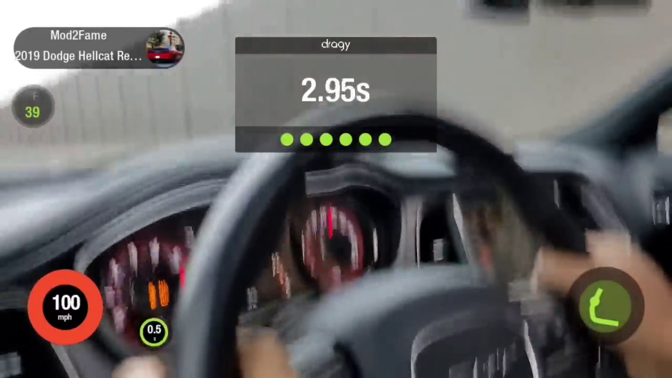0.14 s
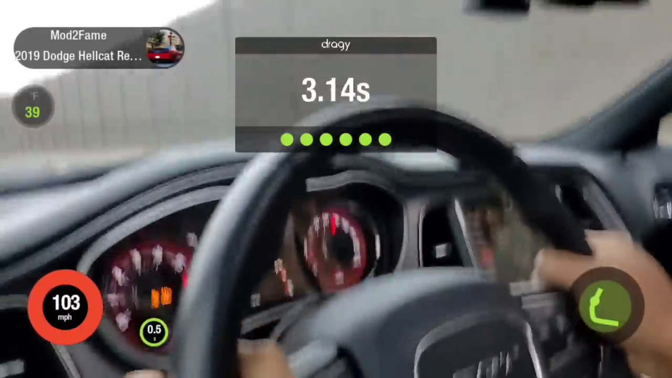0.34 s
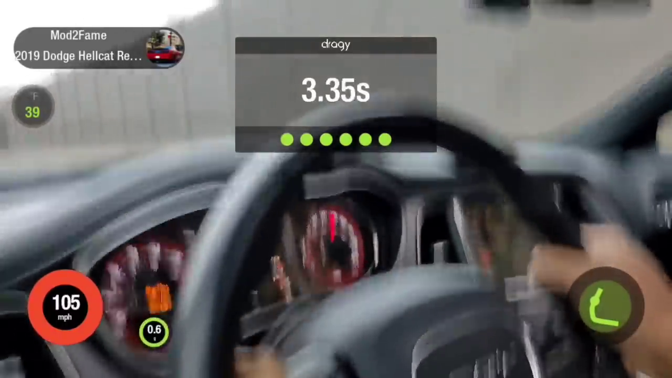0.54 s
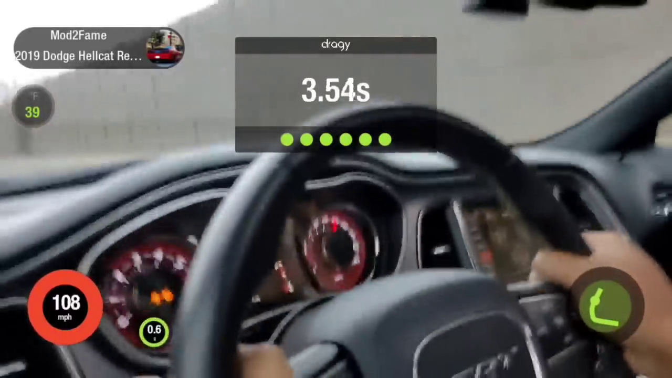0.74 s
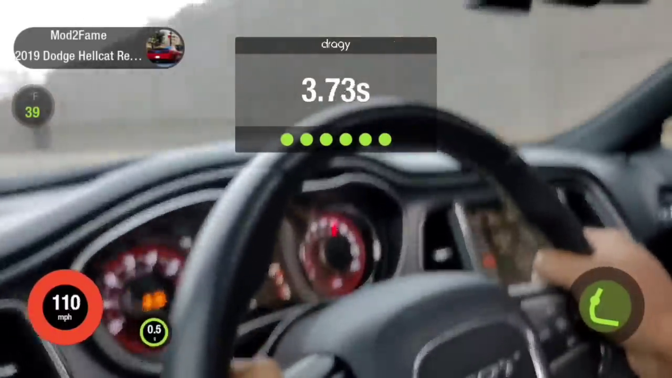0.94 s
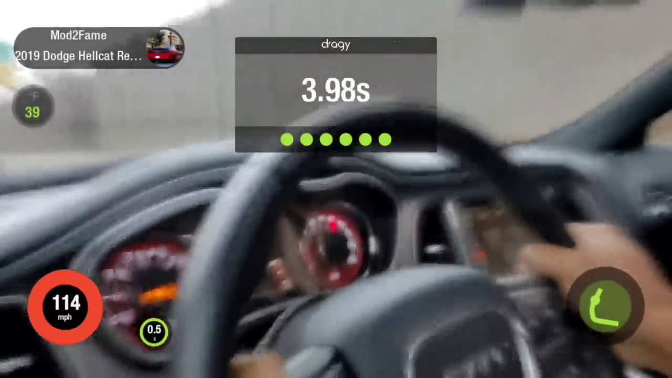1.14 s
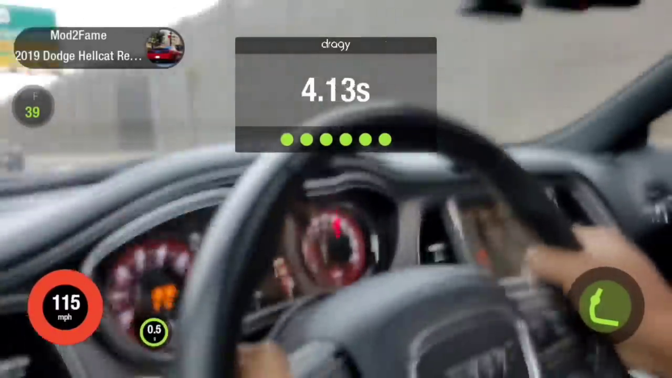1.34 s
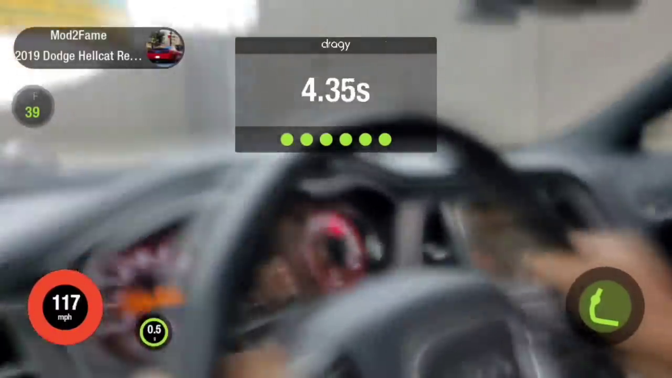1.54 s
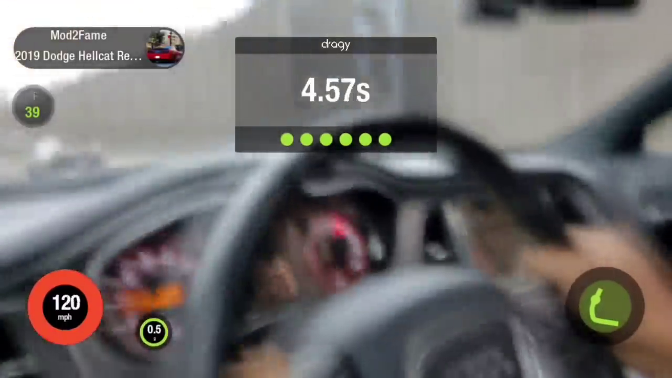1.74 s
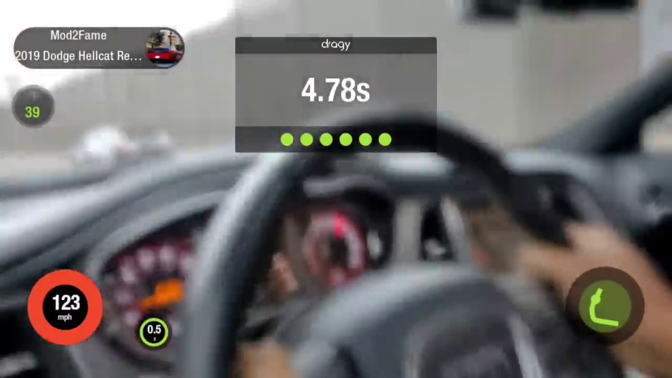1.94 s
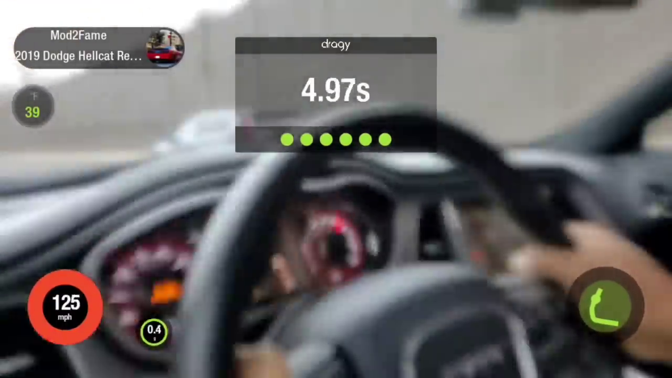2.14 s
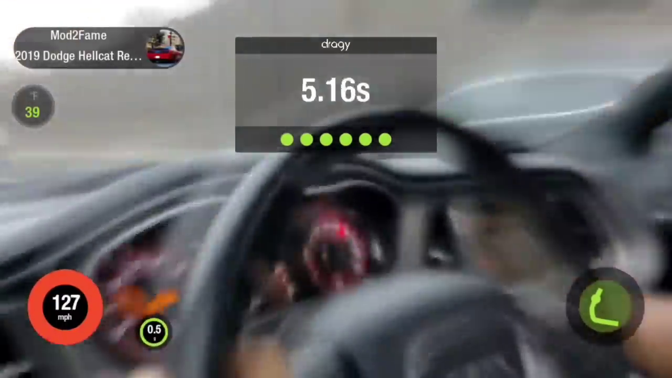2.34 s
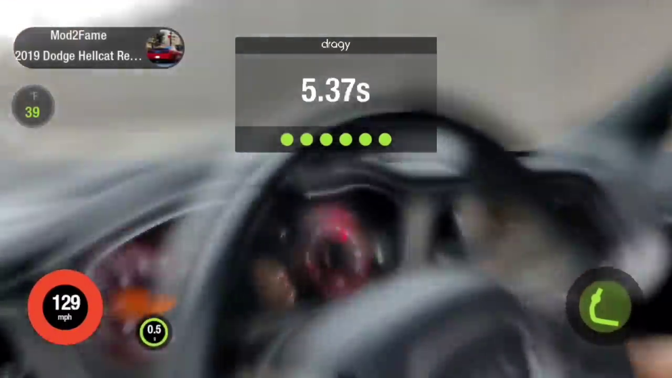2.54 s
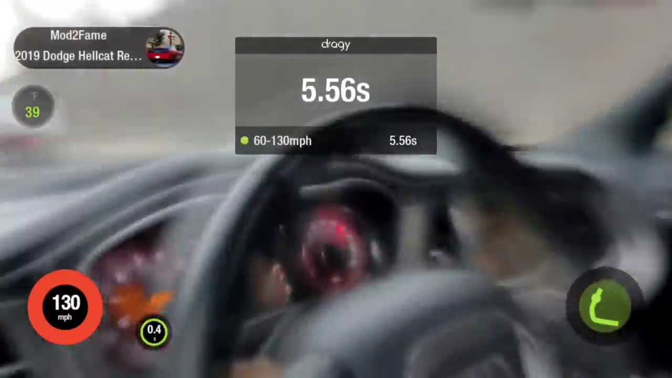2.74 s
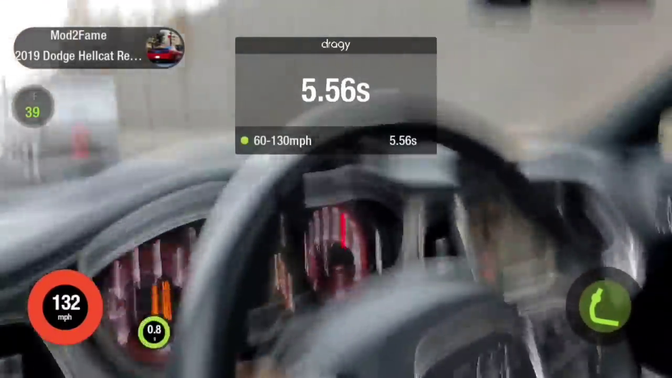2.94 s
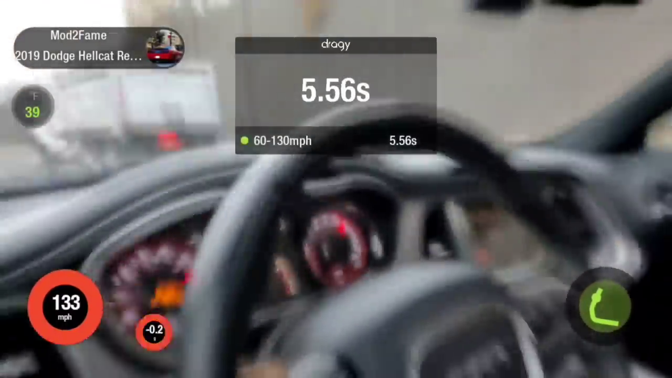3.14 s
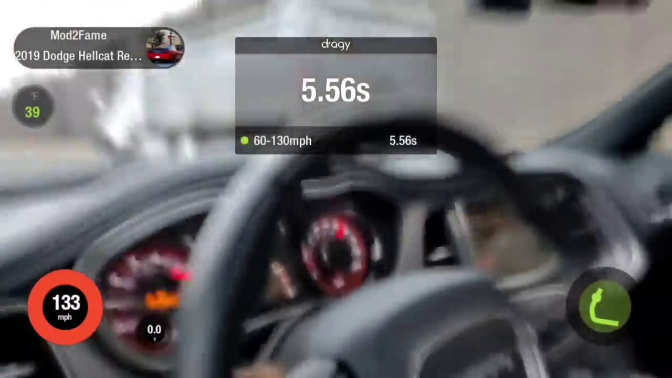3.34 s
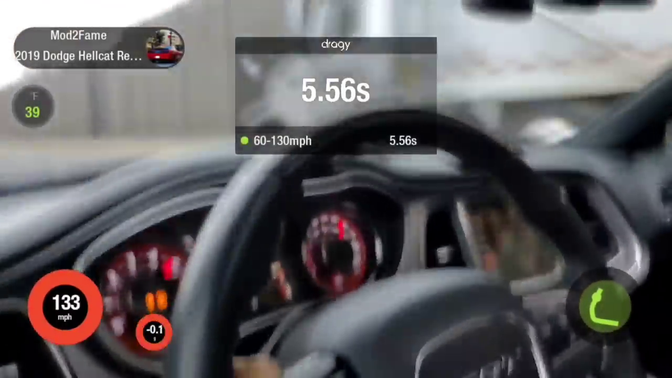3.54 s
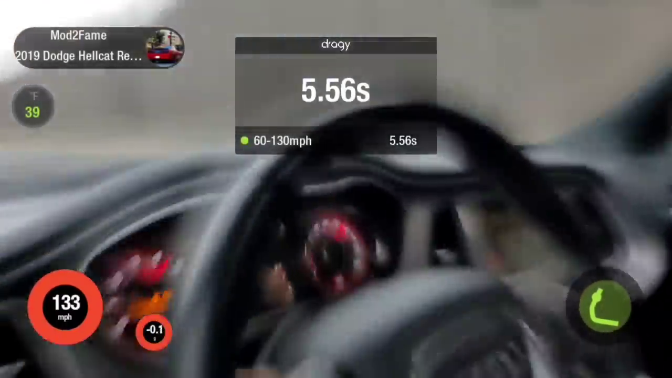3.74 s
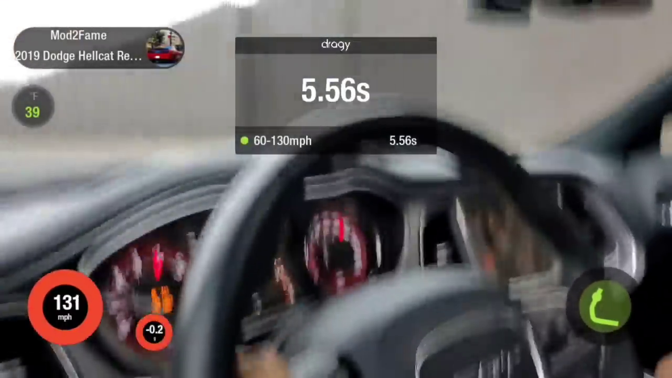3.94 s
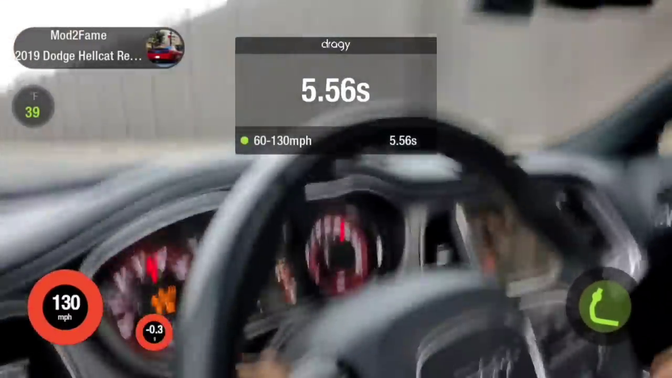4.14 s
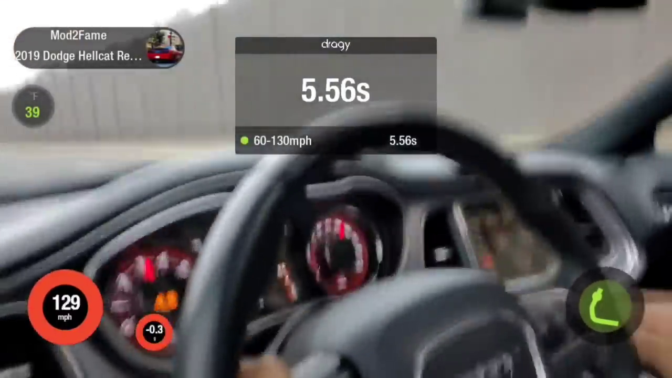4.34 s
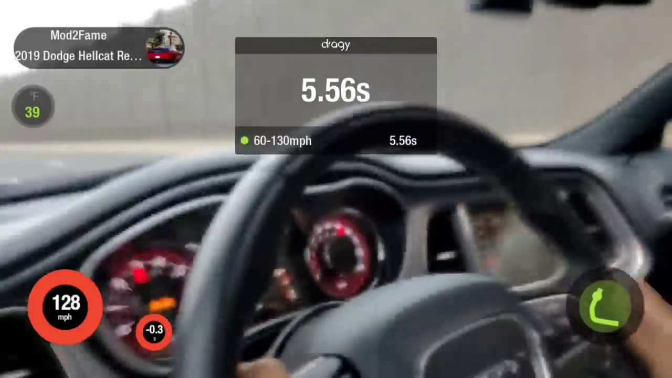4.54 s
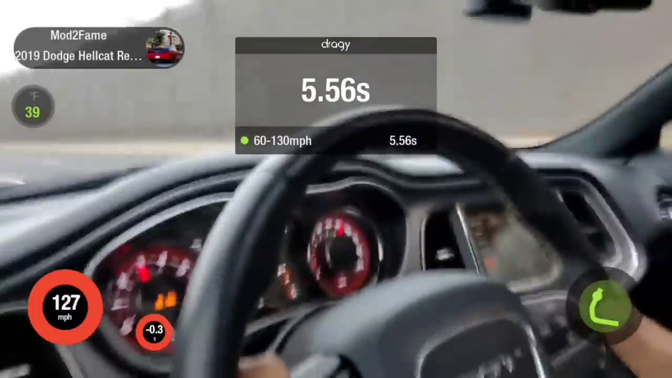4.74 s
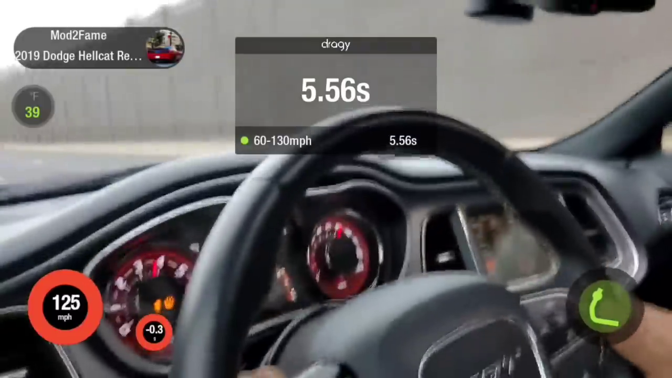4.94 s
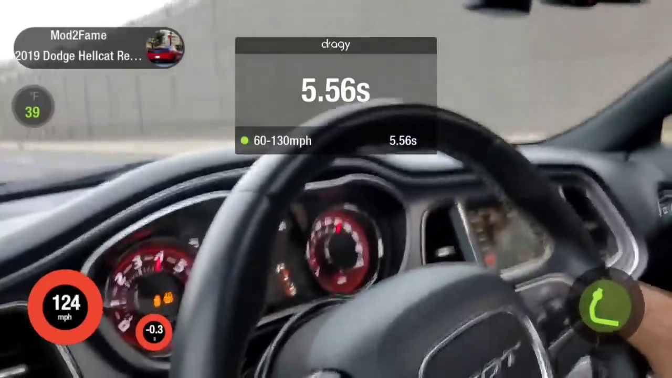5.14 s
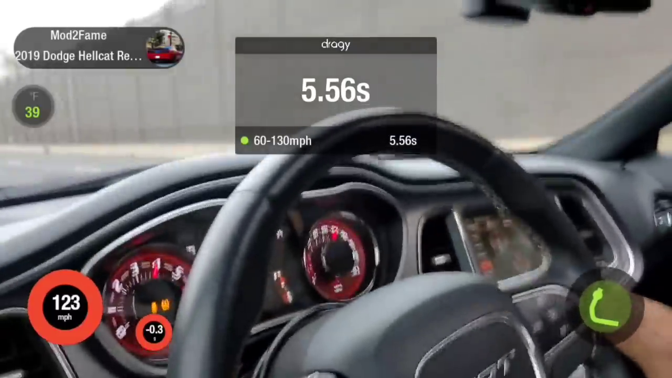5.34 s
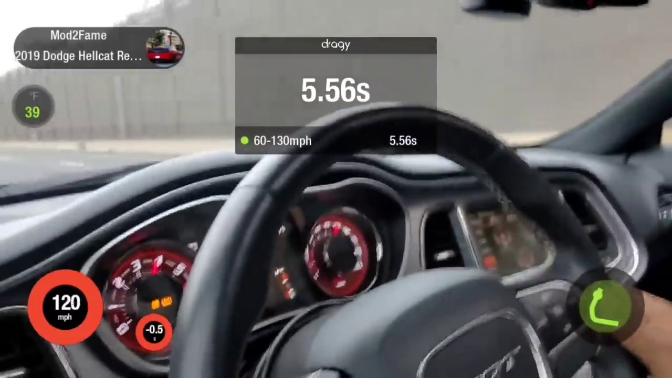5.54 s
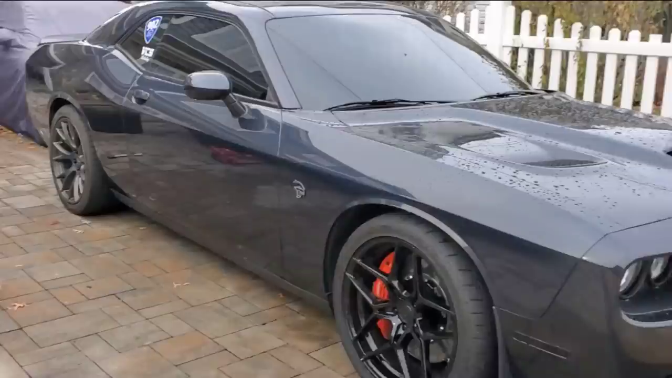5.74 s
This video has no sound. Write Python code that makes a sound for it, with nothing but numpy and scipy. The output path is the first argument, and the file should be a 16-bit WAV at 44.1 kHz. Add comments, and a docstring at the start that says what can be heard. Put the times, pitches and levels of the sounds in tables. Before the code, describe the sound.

Loud V8 pull heard from the cabin, revs and thin blower whine climbing, then throttle shuts, exhaust surges and burbles, revs fall amid road rumble.

```python
"""Supercharged V8 coupe at full throttle, then coasting

Heard from inside on a highway: exhaust orders and blower whine climb with the revs, swelling in fixed resonances.
The driver lifts, the engine surges and burbles amid two short low thumps and its revs fall; tyre rumble, wind and
a driveline drone go on. A loose piece of plastic buzzes and ticks. Tones are phase-driven partials of the engine
cycle or the road speed; the gas, tyres, wind and plastic are shaped stereo noise."""
import sys
import numpy as np
from scipy.fft import rfft, irfft, next_fast_len
from scipy.io import wavfile
from scipy.ndimage import uniform_filter1d, minimum_filter1d, map_coordinates

SR = 44100
rng = np.random.default_rng(int(sys.argv[2]) if len(sys.argv) > 2 else 0)


def waveform_to_disk(signal):
    """Save audio, clipped to [-1, 1], as 16-bit WAV at the path in sys.argv[1]."""
    frames = np.transpose(np.atleast_2d(signal))
    scaled = np.clip(frames, -1, 1) * 32767
    samples = np.round(scaled).astype(np.int16)
    wavfile.write(sys.argv[1], SR, samples)


N = 255339
TIME = np.arange(N) / SR  # seconds
MID_REVS = 52.13  # engine cycles a second in the middle of the pull


def amp(db):
    """Decibels to a linear factor."""
    return 10 ** (np.asarray(db) / 20)


def unit(x):
    """Scale to an rms of 1."""
    return x / np.sqrt(np.mean(x ** 2) + 1e-20)


def along(points, hz):
    """Read (Hz, value) points off a log frequency axis."""
    f, v = np.transpose(points)
    return np.interp(np.log(hz + 1), np.log(f + 1), v)


def curves(rows):
    """One value per sample for each column after the time."""
    s, *cols = np.transpose(rows)
    return [np.interp(TIME, s, c) for c in cols]


def wobble(rate):
    """A smooth random curve through normally distributed knots, rate knots a second."""
    knots = rng.standard_normal(int(N * rate / SR) + 4)
    coarse = TIME[::32]
    return np.interp(TIME, coarse, map_coordinates(knots, [coarse * rate]))


def turns(hz):
    """Running count of turns, fractions included, at a changing speed."""
    return np.cumsum(hz) / SR


def filtered(x, response):
    """Weight the spectrum of x by a response of frequency."""
    m = next_fast_len(N + 8192)
    hz = np.fft.rfftfreq(m, 1 / SR)
    return irfft(rfft(x, m) * response(hz), m)[..., :N]


def burst(start, length):
    """Attack, hold and release of one swell, with straight ramps."""
    attack_s, release_s = 0.016, 0.029
    attack = np.clip((TIME - start) / attack_s, 0, 1)
    release = np.clip(1 - (TIME - start - length) / release_s, 0, 1)
    return attack * release


def resonances(table, hz):
    """Gain in dB of bell-shaped peaks and nulls (centre Hz, half width Hz, dB) at the given frequencies."""
    grid = np.arange(SR // 10)
    bells = [db * np.exp(-((grid - centre) / width) ** 2) for centre, width, db in table]
    return np.interp(hz, grid, sum(bells))


def cabin_noise(spectrum):
    """Stereo noise of rms 1, shaped by (Hz, relative dB): bass alike at both ears, treble diffuse."""
    # Left-right likeness. Each row: frequency in Hz, correlation from -1 to 1.
    likeness = [(30, 1), (60, 1), (130, 0.97), (290, 0.7), (630, 0.24), (1390, -0.32), (3000, 0.054),
                (6000, 0.078)]
    # Tilt of the noise between the ears. Each row: frequency in Hz, left minus right in dB.
    ear_tilt = [(30, 5), (65, 1.5), (120, -1), (200, -2), (380, 4.5), (690, 5.5), (1280, 0.5), (2350, 3),
                (4330, 0.5), (8000, -1), (14000, -1)]

    def mid_side(hz):
        angle = np.arccos(np.clip(along(likeness, hz), -1, 1)) / 2
        return amp(along(spectrum, hz)) * [np.cos(angle), np.sin(angle)]

    def tilt(hz):
        return amp(np.outer([.5, -.5], along(ear_tilt, hz)))

    mid, side = filtered(rng.standard_normal((2, N)), mid_side)
    return unit(filtered(np.array([mid + side, mid - side]), tilt))


def partial(cycle, order, rough, side_db, sway=1.4, scatter=1):
    """One order in stereo, shaken by roughness; scatter (turns) sets its random phase, sway drifts it between ears."""
    unevenness = (1 + rough * (wobble(38) + 1j * wobble(38))) / np.sqrt(1 + 2 * rough ** 2)
    tone = np.sqrt(2) * unevenness * np.exp(2j * np.pi * (order * cycle + scatter * rng.random()))
    side = amp(side_db) * np.exp(1j * sway * wobble(9.2))
    return np.real(tone * np.array([1 + side, 1 - side]))


def wind(rush_db, wind_db=2.5):
    """Air rushes round the pillars: noise whose level flutters both slowly and fast."""
    # Colour of the rush. Each row: frequency in Hz, relative level in dB per Hz.
    wind_colour = [(290, -36.5), (500, -0.5), (542, -8), (742, -20), (863, -12.5), (1130, -13.5),
                   (1450, -14.5), (1690, -19), (3020, -25), (6200, -49.5), (8000, -68), (10400, -99.5),
                   (17600, -120)]
    flutter_db = 0.33 * wobble(12) + 1.3 * wobble(90)
    return amp(rush_db + wind_db + flutter_db) * cabin_noise(wind_colour)


def road(drone_hz, rumble_db, bumps_db=1.17):
    """Tyres rumble over uneven concrete and the driveline drones at road speed."""
    # Colour of the rumble. Each row: frequency in Hz, relative level in dB per Hz.
    tyre_colour = [(15, -26.5), (25, -15), (33, -21), (48, -4), (68, -10.5), (90, -2), (115, -5),
                   (140, -2.5), (175, -5.5), (210, -13), (250, -16), (300, -17.5), (480, -26), (570, -26.5),
                   (660, -32), (900, -41.5), (1500, -84)]
    # The rumble dips briefly. Each row: centre in seconds, half width in seconds, depth in dB.
    lulls = [(2.935, .014, -7), (3.006, 0.015, -10), (3.394, 0.018, -7.5)]
    # Drone level over time. Each row: time in seconds, level in dB.
    drone_level = [(0, -30.5), (1.5, -29), (3.4, -22), (3.7, -16.5), (4.05, -14.5), (4.72, -12.5),
                   (4.88, -21.5), (5.8, -25)]
    lull_db = sum(db * np.exp(-((TIME - s) / width) ** 2) for s, width, db in lulls)
    rumble = amp(rumble_db + lull_db + bumps_db * wobble(10)) * cabin_noise(tyre_colour)
    drone = partial(turns(drone_hz), order=1, rough=0.033, side_db=-24.5)
    return rumble + amp(curves(drone_level)[0]) * drone


def shake(speed, load_db, rest_db=-71, driven_db=-57.0, db_per_rev=0.6, load_share=.8):
    """Level in dB of the loose part's buzz: it grows with revs and load over what the road alone shakes up."""
    engine_db = driven_db + db_per_rev * (speed - MID_REVS) + load_share * load_db
    return 20 * np.log10(np.hypot(amp(rest_db), amp(engine_db))) + 1.5 * wobble(8.6)


def plastic(cycle, buzz_db, chatter_db=0.0, tick_db=-6, scatter_db=5.0):
    """A loose part chatters with the engine's shake, crackles in bouts and now and then scrapes in a louder tick."""
    # Colour of the plastic. Each row: frequency in Hz, relative level in dB per Hz.
    plastic_colour = [(1500, -19), (3500, 4), (5500, -2), (7000, -8), (8000, -14.5), (9400, -1.5),
                      (11600, 2), (13800, -7.5), (14800, -16.5)]
    # The loudest single ticks. Each row: time in seconds, level in dB before the tick_db trim.
    loud_ticks = [(0.8902, -42.5), (0.9794, -43.5), (1.0613, -42.5), (1.768, -42.5), (1.927, -38.5),
                  (1.9907, -37), (2.4698, -40), (2.6281, -42), (2.7396, -41.5), (2.8963, -45),
                  (2.9944, -39.5), (3.9263, -41.5), (3.946, -38.5), (3.9896, -39.5), (4.0305, -35.5),
                  (4.766, -42.5)]
    # Bouts of crackling. Each row: start in seconds, length in seconds, ticks a second, level in dB before scatter.
    bouts = [(0.603, 0.92, 28, -61.5), (1.63, .86, 42, -52), (2.723, .38, 55, -52.5), (3.272, .13, 26, -62)]
    chatter = amp(1.7 * wobble(260)) * (1 + .15 * np.cos(2 * np.pi * cycle))
    ticks = [(s, db + tick_db) for s, db in loud_ticks]
    for start, length, rate, db in bouts:
        chance = rng.standard_normal(size=(200, 2))[:round(length * rate)]
        for i, (late, size) in enumerate(chance):
            when = start + (i + .5 + 0.2 * late) / rate
            ticks.append((when, db + scatter_db * min(size, 1.5)))
    age = np.arange(SR // 50) / SR
    scrape = np.exp(-((age - .004) / .0018) ** 2)  # a bell a few milliseconds long
    blows = np.zeros(N + SR)
    for s, db in ticks:
        blows[round((s - .003) * SR):][:len(age)] += amp(db) * scrape
    return (amp(buzz_db + chatter_db) * unit(chatter) + blows[:N]) * cabin_noise(plastic_colour)


def roar(speed, cycle, load_db, roar_db=-26.5, depth=0.34, db_per_rev=0.24):
    """Turbulent gas, puffed out once a crank turn and once a firing; it grows with load and a little with revs."""
    # Colour of exhaust and intake turbulence. Each row: frequency in Hz, relative level in dB per Hz.
    roar_colour = [(60, -42.5), (130, -1), (280, -3), (480, -8), (700, -31.5), (1000, -24.5), (1500, -26),
                   (1850, -24.5), (2250, -34.5), (3300, -34.5), (4300, -48.5), (6500, -58), (9000, -68.5)]
    crank_puffs = depth * np.cos(2 * np.pi * 2 * cycle)
    firing_puffs = 0.32 * np.cos(2 * np.pi * 8 * cycle)
    gas = unit((1 + crank_puffs + firing_puffs) * cabin_noise(roar_colour))
    return amp(roar_db + load_db + db_per_rev * (speed - MID_REVS)) * gas


def burbles(rise_s=.008):
    """Unburnt fuel goes off in the pipes in short, dull puffs as the throttle shuts."""
    # The puffs. Each row: start in seconds, peak of the noise envelope in dB.
    puffs = [(2.561, -26), (2.691, -23.5), (2.825, -24.5), (2.885, -26.5), (2.949, -27.5)]
    # Colour of the puffs. Each row: frequency in Hz, relative level in dB per Hz.
    puff_colour = [(100, -27), (200, -1.5), (340, 6.5), (560, -4.5), (750, -22), (2000, -46)]
    envelope = 0
    for s, db in puffs:
        age = np.maximum(TIME - s, 0) / rise_s
        envelope += amp(db) * age * np.exp(1 - age)  # peaks after rise_s, then dies away
    return envelope * cabin_noise(puff_colour)


def blower(speed, cycle, load_db, whine_db=-57.5, mesh_db=-57.5, load_share=1.1):
    """Belt-driven rotors mesh about 30 times a cycle; mesh tone and octave follow load and intake resonances."""
    # Resonances and nulls of the intake. Each row: centre in Hz, half width in Hz, gain in dB.
    intake = [(1480, 13, 9.5), (1542, 70, 9.5), (1672, 39, 9), (2860, 19, 3.5), (2902, 19, -5.5),
              (3110, 21, 6), (3120, 45, 8.5), (3130, 22, -8.5), (3210, 14, 12), (3470, 21, -1)]
    meshes = 30.1  # per engine cycle
    mesh = meshes * cycle + .1 * wobble(11)  # the belt flutters
    whine = partial(mesh, order=2, rough=0.17, side_db=2.5, sway=.8)
    whine *= amp(whine_db + resonances(intake, 2 * meshes * speed))
    tone = partial(mesh, order=1, rough=0.34, side_db=-2.5)
    tone *= amp(mesh_db + resonances(intake, meshes * speed))
    return amp(load_share * load_db) * (whine + tone)


def exhaust(speed, cycle, load_db, rough, wheel):
    """The V8's orders follow load and cabin; surges and two low thumps after the lift play on the booming ones."""
    # Exhaust orders. Each row: multiple of the engine cycle, level in dB before cabin and load gains.
    order_levels = [(2, -13.5), (3, -18), (4, -43), (5, -42.5), (6, -43.5), (7, -52.0), (8, -47),
                    (9, -54.5), (10, -56.5), (11, -52), (12, -48.5), (13, -57), (14, -64.5), (15, -58.5),
                    (16, -47), (17, -52.5), (18, -55), (19, -58.5), (20, -54.5), (21, -61), (22, -61.5),
                    (23, -69), (24, -56), (25, -61.5), (26, -62.5), (27, -58), (28, -62), (29, -66),
                    (31, -73), (32, -59), (33, -67), (34, -66), (35, -67), (36, -62), (37, -61.5),
                    (38, -58.5), (39, -61), (40, -63.5)]
    # Resonances and nulls of the cabin. Each row: centre in Hz, half width in Hz, gain in dB.
    cabin = [(100.7, 3.8, -3.5), (142.3, 6.5, -14.5), (156.8, 12, 7.5), (204.9, 20.7, 18.5),
             (234.2, 7, 15.5), (252.8, 13, 13), (298.9, 42.6, 19.5), (319.5, 6, -19.5), (358.2, 8, 15),
             (387, 5.5, 4.5), (446, 65.4, 22.5), (467, 2.3, 4), (532, 14, 11), (561, 7, 6), (571, 12, 12),
             (625, 26, 6.5), (691.3, 25, 14.5), (735, 21, 5.5), (785.6, 20, 10.5), (946, 11, 9),
             (1046, 18, 3), (1290, 110, 3.5), (1376, 28, 6), (1617, 80, 2), (1780, 49, 5.5),
             (2276, 200, -17)]
    # Surges and two short low thumps (2.88 s, 2.96 s: road bumps or exhaust pops) after the lift, played on the
    # second, fourth and eighth orders. Each row: start in seconds, length in seconds,
    # then level in dB of what is played on the second, the fourth and the eighth order.
    swells = [(2.53, 0.068, -19, -30.5, -37.5), (2.61, 0.082, -19.5, -45, -43.5),
              (2.721, .08, -14, -37.5, -36.5), (2.88, 0.022, -19.5, -24, -49), (2.96, 0.024, -24, -47, -44),
              (3.025, 0.097, -10, -30, -42), (3.119, .24, -14.5, -31, -30.5),
              (3.42, 0.1, -18.5, -35, -38.5), (3.55, 0.049, -15, -15, -42), (3.61, .15, -21.5, -28.5, -35),
              (3.78, .12, -39, -19, -38)]
    # Stereo width of the overtones. Each row: frequency in Hz, side minus mid in dB.
    width = [(60, -25.5), (200, -9), (300, -9.5), (500, -10), (800, 2.5), (1200, 4), (3000, -1)]
    hollow_s, hollow_length_s, hollow_db = 2.66, 0.51, -36.5  # the tenth order rings as the throttle shuts
    overrun_s, overrun_db = 4.75, -27  # the fourth order hums once the revs have settled
    throb_scatter = 0.81  # turns: overtones stay partly in step, so the exhaust throbs once a cycle

    level = {round(k): db + resonances(cabin, round(k) * speed) for k, db in order_levels}
    crank, bank, firing = sum(np.outer(amp(dbs), burst(start, length)) for start, length, *dbs in swells)
    crank += amp(level[2] + 1.05 * (load_db + 1))
    bank += amp(level[4] + 1.4 * (load_db + 1))
    bank += amp(overrun_db + 3.2 * wobble(9)) * burst(overrun_s, N / SR)
    firing += amp(level[8] + 1.4 * (load_db + 1.5))
    throb = amp(level[3] + 1.4 * (load_db + 1))  # from the uneven banks, strong only under load
    hollow = amp(hollow_db) * burst(hollow_s, hollow_length_s)

    boom = crank * partial(cycle, order=2, rough=0.076 * rough, side_db=-17.5, sway=0.74)
    # ears swapped for the third order
    boom += throb * partial(cycle, order=3, rough=0.36 * rough, side_db=-16.0, sway=0.54)[::-1]
    boom += bank * partial(cycle, order=4, rough=0.32 * rough, side_db=-21.5)
    boom += firing * partial(cycle, order=8, rough=.6 * rough, side_db=-16.5, sway=.7)
    boom += hollow * partial(cycle, order=10, rough=rough, side_db=-2.5)

    fired = cycle + .0012 * wobble(200)  # firings come a little early or late
    overtones = 0
    for k in sorted(set(level) - {2, 3, 4, 8}):
        lift_db = (load_db + 2.0) * min(0.78 + k / 16, 1.6)  # soft pulses lose their high orders first
        gain = amp(level[k] + lift_db + min(k / 9, 2.6) * wobble(7))
        side_db = along(width, k * MID_REVS)
        overtones += gain * partial(fired, k, rough * (1 + k / 20), side_db, scatter=throb_scatter)
    bounce = 1 + 0.14 * np.sin(2 * np.pi * wheel)  # each wheel turn rocks the body
    return bounce * (boom + amp(0.6 * wobble(160)) * overtones)


def scene():
    """Revs and load drive the engine's sounds; road speed sets the drone and the wheels."""
    # Engine speed. Each row: time in seconds, cycles a second (one cycle is two crank turns and eight firings).
    revs = [(0, 47.4), (1.15, 52.8), (2.14, 57), (2.5, 58.3), (2.78, 57.9), (2.95, 54.5), (3.3, 46.3),
            (3.8, 37.3), (4.05, 34), (5.8, 32)]
    # Throttle. Each row: time in seconds, engine load in dB, roughness (0 is smooth, about 1 is rough).
    throttle = [(0, 0, 0), (.4, 1, 0.18), (1.2, -1.5, 0.02), (1.6, -1.43, 0.18), (1.95, -2, 0.07),
                (2.46, -1.6, 0.21), (2.495, -10, 1), (2.58, -8, 1.2), (2.65, -10, 1), (2.73, -6.5, .9),
                (2.8, -8, 1), (3.0, -15, 0.8), (3.15, -14, 0.2), (3.4, -13.5, 0.86), (5.8, -14.5, 0.72)]
    # Road speed. Each row: time in seconds, speed in km/h.
    road_speed = [(0, 159), (1.5, 189), (3.1, 214), (3.8, 214), (5.8, 193)]
    # Background levels. Each row: time in seconds, rumble in dB, wind in dB before its trim.
    background = [(0, -20.5, -39), (1.1, -20.5, -43.5), (2.1, -23, -43), (2.6, -17.5, -40),
                  (3.5, -19, -43.5), (5.2, -19, -43), (5.8, -20.5, -45.5)]
    drone_hz_per_kmh = .4365
    speed, = curves(revs)
    cycle = turns(speed)
    load_db, rough = curves(throttle)
    rumble_db, rush_db = curves(background)
    drone_hz = drone_hz_per_kmh * curves(road_speed)[0]
    wheel = turns(drone_hz / 2.5)
    surroundings = wind(rush_db) + road(drone_hz, rumble_db) + plastic(cycle, shake(speed, load_db))
    gas = roar(speed, cycle, load_db) + burbles()
    engine = blower(speed, cycle, load_db) + exhaust(speed, cycle, load_db, rough, wheel)
    return surroundings + gas + engine


def record(dry):
    """A limiter holds the peaks; the sound fades in and out; nothing passes above the band limit."""
    top_hz = 15000
    needed = np.minimum(1, .97 / (np.abs(dry).max(axis=0) + 1e-9))
    gain = uniform_filter1d(minimum_filter1d(needed, size=900), size=900)
    fade = amp(np.interp(TIME, [0, .006, 5.715, 5.76, 5.79], [-40, 0, 0, -6, -20]))  # seconds, dB
    return filtered(dry * gain * fade, lambda hz: hz < top_hz)


dry = scene()
out = record(dry)
waveform_to_disk(out)
```